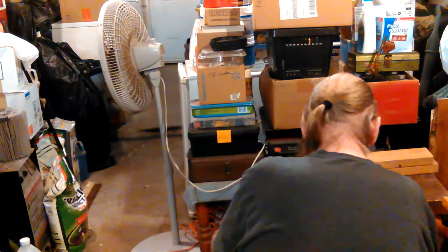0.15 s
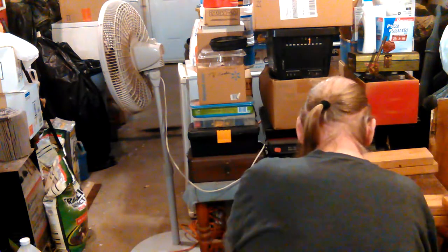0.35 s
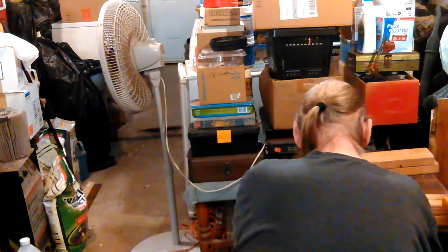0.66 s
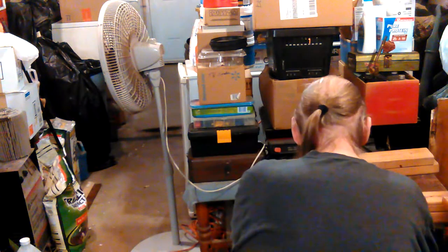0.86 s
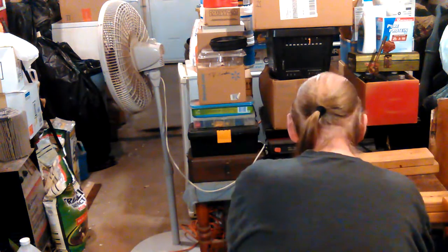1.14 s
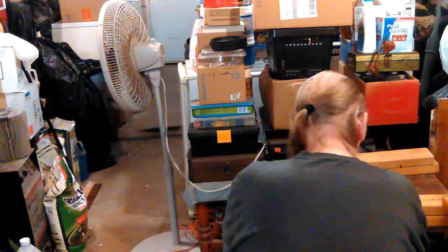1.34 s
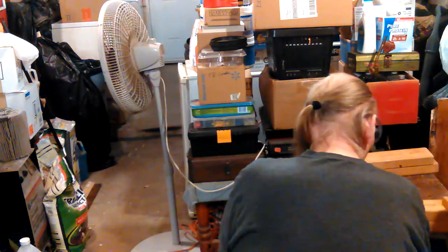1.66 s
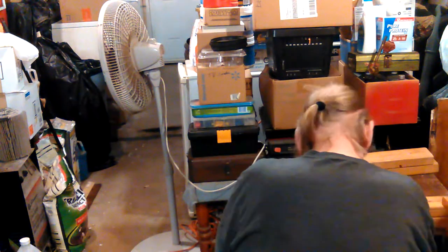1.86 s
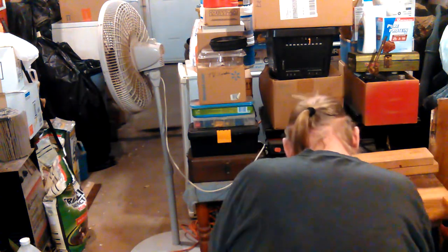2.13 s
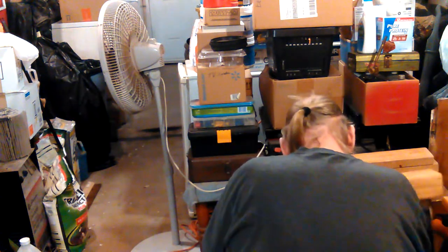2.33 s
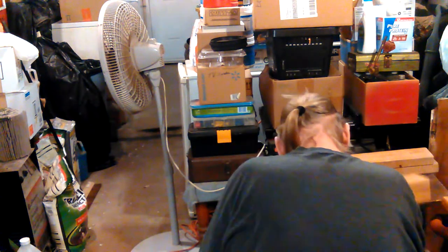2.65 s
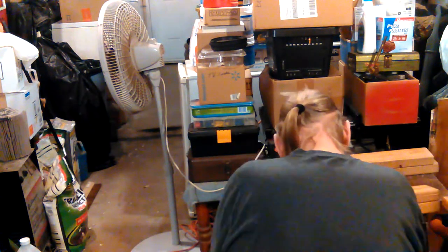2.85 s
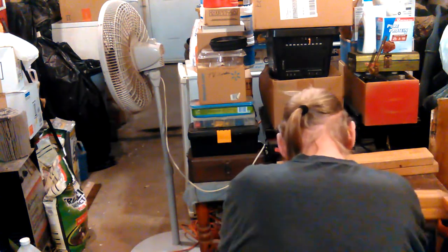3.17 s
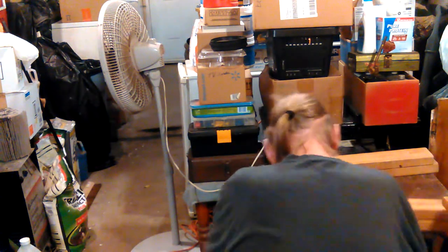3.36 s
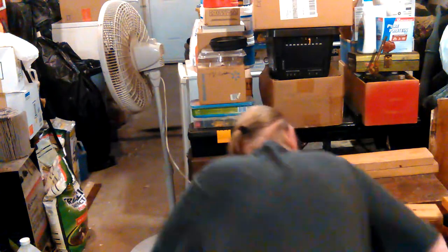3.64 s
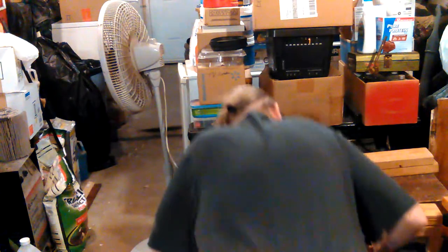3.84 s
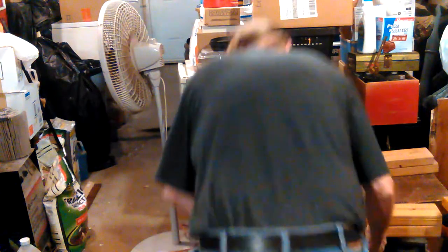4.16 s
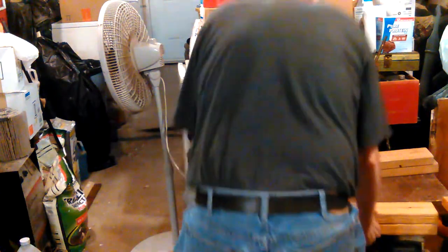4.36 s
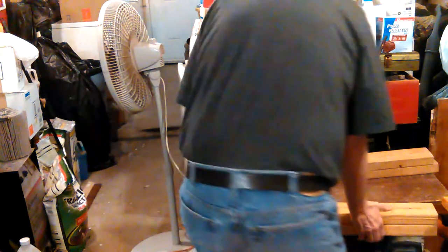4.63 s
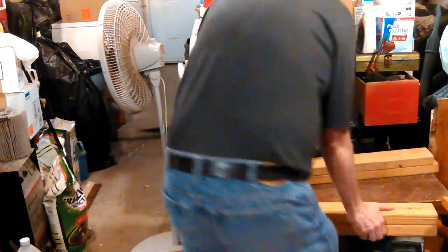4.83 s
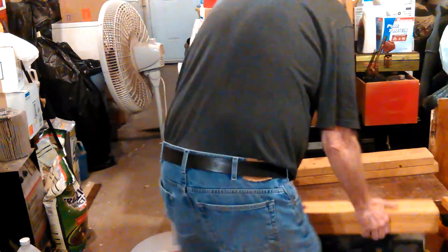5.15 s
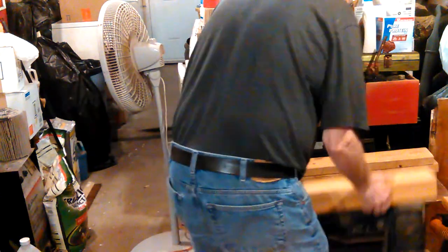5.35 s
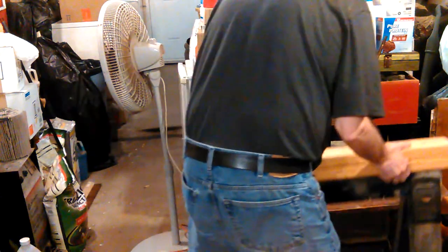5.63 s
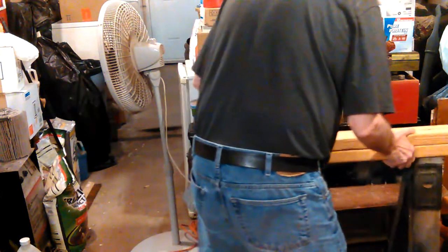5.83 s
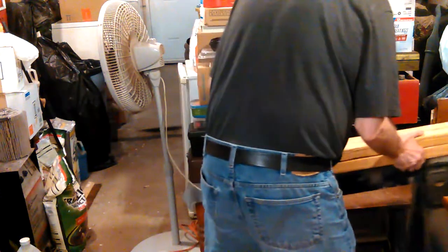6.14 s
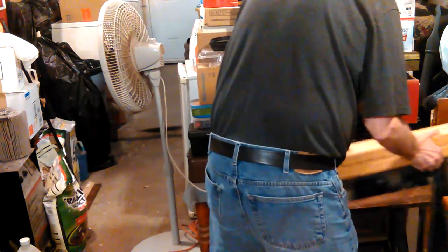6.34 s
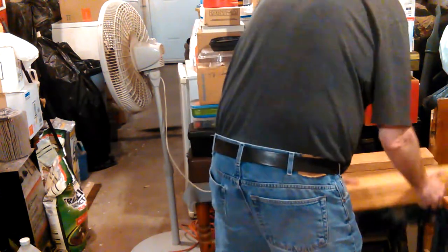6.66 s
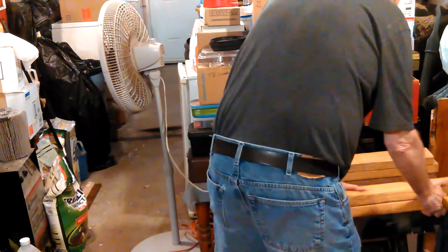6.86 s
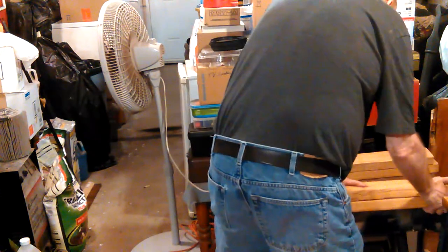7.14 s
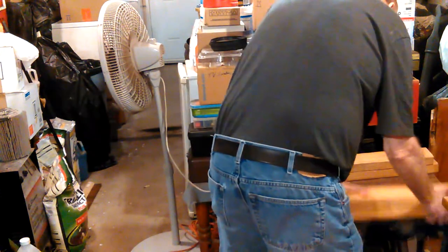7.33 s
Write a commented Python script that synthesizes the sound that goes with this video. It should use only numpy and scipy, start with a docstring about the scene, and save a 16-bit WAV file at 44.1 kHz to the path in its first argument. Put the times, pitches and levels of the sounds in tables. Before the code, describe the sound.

Over a very faint low rumble and hiss, dry wood rubs softly from the start. Board knocks come at 0.3, 0.4 and 0.5 s, with a firm one at 0.8, lighter taps near 1.3, and knocks at 1.6 and 1.7 with a small metal clink. Soft rubbing continues from 2 s; at 2.9 a strong, dull wooden clunk lands. Another sharp knock at 3.5 brings bright metal clinks, which cluster again from 3.9 to 4.4 as a stool scrapes back roughly, fading into one soft thud at 4.4. It quiens to faint scuffs and a small tap at 5.0. A bundle clunks dully at 5.5, more weakly at 5.7. A brief squeak at 6.1 is followed by muted bumps at 6.35 to 6.8. After faint rubbing, the load slams down at 7.4, loudest of all, hard and woody with a low boom. Close pickup, short garage reverberation.

```python
"""Short wooden boards are shifted, knocked together and stacked on a bench in a cluttered garage.
Over a faint hush, wood rubs on wood by stick-slip friction and a stool's metal joints clink by modal ringing.
Knocks are damped modes in a dense ring scattered off the clutter; heavy blows boom the bench's lowest modes.
A bundle clunks as one dull body, in two stages; midway the stool scrapes back with more clinks and thuds once as
the worker stands. A bundle briefly squeaks on the stack, and at the end the load lands hard on it."""
import sys
import numpy as np
from scipy import signal
from scipy.io import wavfile

SR = 44100
rng = np.random.default_rng(int(sys.argv[2]) if len(sys.argv) > 2 else 0)


def wrap_up_sound(samples):
    """Save the sound to the file named by the first command line argument, as 16-bit audio."""
    columns = np.atleast_2d(samples).T
    # keep every value between -1 and 1, then stretch to whole-number steps
    tamed = np.clip(columns, -1, 1)
    steps = np.round(tamed * 32767).astype(np.int16)
    wavfile.write(sys.argv[1], SR, steps)


N = 330309

# Normal modes of the loose boards. Each row: frequency in Hz, strength in dB, t60 in seconds.
BOARD_MODES = [(207.2, 1.5, 0.13), (337, -8, 0.2), (405.3, 2, 0.12), (453.4, -8, 0.16), (516, -3.5, 0.13),
               (604, -6, 0.13), (785, -1.5, 0.1), (895, -1, 0.13), (998, -5, 0.083), (1117, -2.5, 0.097),
               (1173.5, -5.5, 0.14), (1320, -9, 0.22), (1392, -6.5, 0.1), (1593, 1.5, 0.082),
               (1795, -19, 0.45), (2184, 0, 0.12), (2344, -8, 0.18), (2516, -6.5, 0.152),
               (3310, -12.5, 0.28), (3890, -6, 0.11), (5480, -1, 0.2)]
# Normal modes of the stool's frame. Each row: frequency in Hz, strength in dB, t60 in seconds.
STOOL_MODES = [(3080, -3, 0.2), (4180, -14.5, 0.25), (4180, -10, 0.24), (5750, -7.5, 0.14),
               (5840, -1.5, 0.089), (6400, -5.5, 0.19), (6470, -6, .2), (6060, -9.5, 0.16),
               (6550, 1.5, 0.074), (7200, -4.5, 0.21), (7430, -10, 0.25), (8800, -2, .15),
               (9690, -7.5, .15)]
# Frequencies in Hz at which weight, level, brightness and snap act.
TILT_HZ = [300, 1100, 4000, 10000]
EDGES = 22 * 2 ** np.arange(0, 9.6, .5)  # half-octave band edges, Hz
CENTRES = np.sqrt(EDGES[1:] * EDGES[:-1])
AGE = np.arange(int(.6 * SR)) / SR  # seconds since a blow


def from_db(db):
    """Logarithmic level: decibels become an amplitude ratio."""
    return 10 ** (np.asarray(db) / 20)


def rms_one(x):
    """Normalization: the mean power is scaled to 1."""
    return x / np.sqrt(np.mean(x ** 2) + 1e-20)


def at_hz(points, hz):
    """Interpolation of a spectrum along logarithmic frequency."""
    f, value = np.transpose(points)
    return np.interp(np.log(hz), np.log(f), value)


def add(track, sound, s):
    """Superposition: a sound is summed in at a time in seconds."""
    start = max(round(s * SR), 0)
    track[:, start:start + sound.shape[-1]] += sound[..., :N - start]


def spread(mid, side, hz):
    """Mid-side stereo: left and right differ chiefly in the treble."""
    # Stereo width. Each row: frequency in Hz, side against mid in dB.
    stereo_width = [(2500, -50), (4500, -60.5), (7000, -4.5), (13000, -6.5)]
    width = from_db(at_hz(stereo_width, hz))
    return mid + width * side * np.array([[1], [-1]])


def split(sources):
    """Band analysis: half-octave stereo bands of rms 1, neighbours taking unrelated sources."""
    bands = []
    for k, hz in enumerate(CENTRES):
        sos = signal.butter(2, EDGES[k:k + 2], "band", fs=SR, output="sos")
        mid, side = signal.sosfilt(sos, sources[k % 2] + 1e-18)
        bands.append(rms_one(spread(mid, side, hz)))
    return bands


def hush():
    """Steady broadband noise: the low rumble and faint hiss of the still garage."""
    # Relative spectral density of the still air. Each row: frequency in Hz, density in dB per Hz.
    hush_spectrum = [(15, -30), (25, 3.5), (91, 0), (151, -7.5), (231, -14.5), (511, -16.5), (569, -22),
                     (632, -12.5), (703, -19.5), (1600, -22), (1970, -24), (5260, -28), (14000, -37)]
    bands = split(rng.standard_normal((2, 2, N)))
    air = 0
    for hz, band in zip(CENTRES, bands):
        # band power grows with bandwidth, hence with frequency
        air = air + band * from_db(at_hz(hush_spectrum, hz)) * np.sqrt(hz)
    return from_db(-64) * rms_one(air)


def clutter(x, echo_db, count=12):
    """Comb filtering: near boxes and shelves return echoes in a fixed pattern of delays."""
    lags_s = .0011 * 1.29 ** np.arange(count)
    echoes = 0
    for k, lag_s in enumerate(lags_s):
        echoes = echoes + (-1) ** (k // 2) * np.roll(x, round(lag_s * SR), axis=-1)
    return x + from_db(echo_db) * echoes


def resonate(x, modes, boost_db):
    """Resonance: a broadband drive is reinforced at the modes of the excited body."""
    out = x
    for hz, mode_db, t60 in modes:
        # this Q makes the filter ring for about a third of t60
        b, a = signal.iirpeak(hz, hz * t60 / 6, fs=SR)
        out = out + from_db(boost_db + mode_db) * signal.lfilter(b, a, x)
    return out


def drift():
    """Random modulation: quick uneven wavering between random values of unit spread."""
    step_s = .022
    knots = rng.standard_normal(int(N / SR / step_s) + 2)
    return np.interp(np.arange(N) / SR / step_s, np.arange(len(knots)), knots)


def stroke(length_s, growth_db):
    """Force envelope: a push takes hold (the longer, the more gently), grows or fades, then dies away in the room."""
    attack_share, release_db_per_s = .22, 255
    t = np.arange(int(length_s * SR) + len(AGE)) / SR
    attack = 1 - np.exp(-(t / (attack_share * length_s)) ** 2)
    held_db = growth_db * (np.minimum(t / length_s, 1) - .5)
    release_db = release_db_per_s * np.maximum(t - length_s, 0)
    return attack * from_db(held_db - release_db)


def sliding(strokes, modes, slips_per_s, size_db, judder_db, smear_db, boost_db):
    """Stick-slip friction: tiny uneven slips, smeared by the room, excite wood and frame."""
    # Colour of sliding. Each row: frequency in Hz, level in dB per half octave.
    slide_colour = [(50, -23.5), (120, -18.5), (210, -11), (340, -8), (560, -11.5), (900, -8), (1500, -8),
                    (2300, -7.5), (4000, -9), (6200, -7), (9000, -18), (13500, -21)]
    shape = (2, 2, N)
    happens = rng.random(shape) < slips_per_s / SR
    slips = happens * from_db(size_db * np.minimum(rng.exponential(1, shape), 4))
    smear = from_db(smear_db) * rng.standard_normal(shape)
    friction = rms_one(slips * rng.choice([-1, 1], shape)) + smear
    bands = split(resonate(clutter(friction, echo_db=-24), modes, boost_db))
    pushes = [stroke(length_s, growth_db) for _, length_s, _, _, _, growth_db in strokes]
    out = 0
    for hz, band in zip(CENTRES, bands):
        force = np.zeros((1, N))
        for (s, _, level, weight, bright, _), push in zip(strokes, pushes):
            tilt = at_hz(list(zip(TILT_HZ, (weight, 0, bright))), hz)
            add(force, push * from_db(level + tilt), s)
        out = out + band * force * from_db(at_hz(slide_colour, hz))
    return out * from_db(judder_db * drift())


def rubbing():
    """Dense stick-slip friction: wood and sleeves rub over wood."""
    # Each row: start in seconds, length in seconds, level in dB, weight (bass against level) in dB,
    # brightness (treble against level) in dB, growth over the stroke in dB.
    rubs = [(0.0, 0.11, -63, -0.5, -11, 1), (0.14, 0.3, -58.5, -5, 2, 6), (0.47, 0.078, -48, -1, -2, -9.5),
            (0.56, 0.087, -70, -3, -11, -6), (1.413, 0.019, -58.5, 3, -20, -4),
            (1.445, 0.097, -56.5, 0.5, 5, -5.5), (1.78, .15, -56.5, -0.5, -3, -10),
            (2.04, 0.24, -69.5, 7, -6, -1.5), (2.28, 0.22, -60.5, 0, -15, -4),
            (2.46, 0.18, -55, -1.5, -15, 1.5), (2.65, 0.1, -64.5, -8, -4.5, 0),
            (2.775, 0.031, -66.5, 2, 8, 6), (3.15, 0.19, -65.5, -8, 10.5, 7.5),
            (3.375, .03, -56.5, 3, -1.5, -6.5), (3.43, 0.052, -62.5, -13, 2, 13),
            (3.66, 0.29, -58.5, 4.5, -4, -7), (4.5, 0.071, -72, 6, 1, -4),
            (4.85, 0.044, -64.5, -10, 5, 6.5), (5.1, .1, -67.5, -7, -3, -14),
            (5.27, 0.16, -74.5, -4, 3.5, 2), (5.84, .07, -83, 12, 7, -3), (6.083, 0.026, -57, 1, 3.5, 5.5),
            (6.46, 0.19, -64.5, 15, -1.5, -8), (6.82, 0.12, -62.5, 13.5, -1.5, -7),
            (6.97, .2, -69, 7, 2, 10), (7.18, .1, -64.5, 14.5, -3, -1.5), (7.29, 0.1, -74.5, 10, -7, 12)]
    return sliding(rubs, BOARD_MODES + STOOL_MODES, slips_per_s=500, size_db=2.0,
                   judder_db=2.0, smear_db=0.5, boost_db=6.5)


def scatter(rise_s, hold_s, early_t60, late_db, direct_db, direct_s):
    """Room response by band: the contact, a crowd of near reflections, then the reverberant tail."""
    # Late reverberation of the garage. Each row: frequency in Hz, t60 in seconds.
    garage_t60 = [(60, 1.5), (300, 0.4453), (1200, 0.354), (5000, 0.48), (13000, 0.3)]
    since = np.maximum(AGE - hold_s, 0)
    direct = from_db(direct_db) * np.exp(-AGE / direct_s)
    early = from_db(-60 * since / early_t60)
    onset = 1 - np.exp(-AGE / rise_s)
    envelopes = []
    for hz in CENTRES:
        late = from_db(late_db - 60 * since / at_hz(garage_t60, hz))
        # unrelated arrivals add by power
        envelopes.append(onset * np.sqrt(direct ** 2 + early ** 2 + late ** 2))
    return envelopes


def blow_db(hz, blow):
    """Excitation spectrum: weight sets the bass, hardness of contact the treble, and the note stands out."""
    note_lift_db, note_octaves = 3, 0.32
    level, weight, bright, snap, note_hz = blow
    tilt = at_hz(list(zip(TILT_HZ, (weight, 0, bright, bright + snap))), hz)
    distance = np.log2(hz / note_hz) / note_octaves
    return level + tilt + note_lift_db * np.exp(-.5 * distance ** 2)


def dense_ring(strengths_db, colour, bands, envelopes):
    """Statistical acoustics: countless damped modes and reflections become noise of set energy per band."""
    out = 0
    start = rng.integers(bands[0].shape[-1] - len(AGE))
    for hz, level_db, band, envelope in zip(CENTRES, strengths_db, bands, envelopes):
        burst = band[:, start:start + len(AGE)] * envelope
        envelope_rms = np.sqrt(np.mean(envelope ** 2))
        out = out + from_db(level_db + at_hz(colour, hz)) * rms_one(burst) * envelope_rms
    return out


def clear_ring(strengths_db, modes, swell_s):
    """Modal superposition: strong damped modes in alternating sign, varied a little by where the blow lands."""
    out = 0
    for k, (hz, mode_db, t60) in enumerate(modes):
        level_db = strengths_db[k] + mode_db + rng.standard_normal()
        turn = 2 * np.pi * hz * AGE
        decay = from_db(level_db - 60 * AGE / t60)
        out = out + (-1) ** k * spread(np.sin(turn), np.cos(turn), hz) * decay
    return out * (1 - np.exp(-AGE / swell_s))


def blows(events, modes, colour, envelopes, boost_db, swell_s, ring_db, note_db):
    """Impact excitation: each blow sounds clear modes and a note in a dense ring tinted by the same modes."""
    note_t60 = 0.13  # seconds
    out = np.zeros((2, N))
    field = clutter(rng.standard_normal((2, 2, N // 3)), echo_db=-18)
    bands = split(resonate(field, modes, boost_db))
    for s, *blow in events:
        rung = np.array([*modes, (blow[-1], note_db, note_t60)])
        dense = dense_ring(blow_db(CENTRES, blow), colour, bands, envelopes)
        clear = clear_ring(blow_db(rung[:, 0], blow), rung, swell_s)
        add(out, dense + from_db(ring_db) * clear, s)
    return out


def stool():
    """Impact of stiff bodies: loose metal joints clink as the weight on them shifts."""
    # Each row: start in seconds, level in dB, weight (bass against level) in dB,
    # brightness (treble against level) in dB.
    clinks = [(0.028, -67, 4, 8.5), (0.152, -62, -14, 4), (1.544, -45, -2, -5.5), (3.479, -41.5, 6, 7.5),
              (3.565, -31, -12, -0.5), (3.933, -39.5, -3.5, 5.5), (3.965, -34, -4, 10.5),
              (3.987, -35, -12.5, 7), (4.127, -38, 2, -0.5), (4.297, -44.5, -6, -2.5),
              (4.377, -48.5, -18, 5)]
    # Colour of a metal blow. Each row: frequency in Hz, level in dB per half octave.
    metal_colour = [(50, -26), (120, -24), (300, -13.5), (1100, -16), (2200, -12.5), (4000, -10),
                    (6200, -7.5), (9000, -7), (13500, -13.5)]
    snap_db, note_hz = -12, 6330
    envelopes = scatter(rise_s=0.00054, hold_s=0.021, early_t60=0.21,
                        late_db=-17.0, direct_db=-1, direct_s=0.0021)
    contacts = [(*row, snap_db, note_hz) for row in clinks]
    return blows(contacts, STOOL_MODES, metal_colour, envelopes,
                 boost_db=4, swell_s=0.0021, ring_db=-10, note_db=-12)


def bench():
    """Low-order resonance: heavy blows set the loaded bench booming on its lowest modes."""
    # Each row: start in seconds, level in dB.
    booms = [(0.299, -57.5), (1.59, -55.5), (1.74, -48.5), (2.925, -53.5), (3.509, -50), (6.352, -49.5),
             (6.741, -48.5), (7.416, -38.5)]
    # Normal modes of the bench. Each row: frequency in Hz, strength in dB, t60 in seconds.
    bench_modes = [(59.97, -0.5, 0.99), (97.3, -8.5, .35), (147, 5, 0.28), (190, -10, 0.18)]
    boom = 0
    for k, (hz, mode_db, t60) in enumerate(bench_modes):
        decay = from_db(mode_db - 60 * AGE / t60)
        boom = boom + (-1) ** k * np.sin(2 * np.pi * hz * AGE) * decay
    swell = 1 - np.exp(-AGE / 0.0074)
    out = np.zeros((2, N))
    for s, level_db in booms:
        add(out, from_db(level_db) * boom * swell, s)
    return out


def knocking():
    """Modal impact: boards knock, the stool thuds once and a bundle briefly squeaks on the stack."""
    # The thud is at 4.411 s and the squeak at 6.094 s; both share the modes and colour of the knocks.
    # Each row: start in seconds, level in dB, weight (bass against level) in dB, brightness (treble
    # against level) in dB, snap (very top against treble) in dB, each event's own note in Hz.
    knocks_thud_squeak = [(0.300, -28.5, -12.5, -17.5, -4, 531), (0.403, -26.5, -12.5, -12, -6, 1010),
                          (0.501, -36, -11, -10.5, -4.5, 405), (0.73, -58.5, -4.5, -1, -20, 333),
                          (0.808, -24.5, -15, -16, -6.5, 417), (1.28, -51.5, -9.5, -8, -16, 330),
                          (1.368, -46.5, -24, -9.5, -6, 877), (1.587, -24.5, -11, -21.5, -11, 297),
                          (1.706, -45.5, 0, -7, -20, 210), (1.728, -30, -1, -12.5, -10.5, 955),
                          (2.291, -48, -20, -15, -10, 393), (2.83, -41, -25, -13.5, -22, 1405),
                          (2.905, -26.5, -6.5, -17.5, -18, 239), (2.921, -15.5, -16, -32.5, -14, 450),
                          (3.329, -42.5, -21, -19, -9, 1363), (3.383, -48.5, -5.5, -5, -20, 310),
                          (3.504, -15.5, -14.5, -13.5, -7, 231), (4.104, -34.5, -13, -13.5, -22, 1580),
                          (4.411, -43.5, 2, -11, -15, 385), (4.702, -60.5, 12, 9.5, 2, 212),
                          (4.761, -61, 1, -3.5, -17, 200), (5.028, -43, 0, -0.5, -15, 185),
                          (6.094, -39, -8.5, -3, -32, 2800), (6.344, -37, -1, -23.5, -12, 240),
                          (6.411, -40, 0, -12, -26, 420), (6.58, -46.5, -3.5, -16.5, -4, 620),
                          (6.699, -37.5, -4, -10, -11, 384), (6.774, -44, -1, -4, -16, 2930),
                          (6.979, -43.5, -16, -12.5, -16, 1160), (7.41, -9.5, -16, -13.5, -14, 482),
                          (7.4155, -8, -18, -18, -7.5, 1560)]
    # Colour of these sounds. Each row: frequency in Hz, level in dB per half octave.
    wood_colour = [(50, -22.5), (120, -19), (200, -16), (330, -6.5), (650, -15), (1150, -15.5), (2200, -12),
                   (4000, -9.5), (6200, -3), (9000, -12), (13500, -13)]
    envelopes = scatter(rise_s=0.0023, hold_s=0.012, early_t60=0.19,
                        late_db=-12.5, direct_db=-3.0, direct_s=0.006)
    return blows(knocks_thud_squeak, BOARD_MODES, wood_colour, envelopes,
                 boost_db=4, swell_s=0.0088, ring_db=-10, note_db=3.5)


def bundle():
    """Soft impact of a large mass: the dull bundle lands in two stages and its low modes build slowly."""
    # Each row: start in seconds, level in dB, weight (bass against level) in dB,
    # brightness (treble against level) in dB.
    clunks = [(2.922, -34.5, -1.5, -21), (5.475, -20, -6.5, -19), (5.713, -41.5, -0.5, -13),
              (6.738, -44, 8.5, -4), (6.865, -64, 17, -1)]
    # Normal modes of the bundle. Each row: frequency in Hz, strength in dB, t60 in seconds.
    bundle_modes = [(207, 0.5, 0.12), (251, -5.5, 0.04), (317, -0.5, 0.095), (340.2, 1, 0.2),
                    (465, -5, 0.15), (783, -3, 0.14), (867, -5.5, 0.066), (938, -6.5, 0.144),
                    (1030, -1.5, 0.13), (1210, -13, 0.18), (1400, -17, .15), (1580, -5, 0.096),
                    (1790, -21, 0.2)]
    # Colour of a clunk. Each row: frequency in Hz, level in dB per half octave.
    bundle_colour = [(50, -38), (120, -22), (210, -14.5), (340, -4), (560, -10.5), (850, -12.5),
                     (1500, -16), (2200, -11), (4000, -8.5), (6200, -4), (9000, -11.5), (13500, -14)]
    snap_db, note_hz = -11.5, 281
    envelopes = scatter(rise_s=0.0055, hold_s=0.0041, early_t60=0.15,
                        late_db=-16.5, direct_db=4, direct_s=0.0031)
    # one edge lands first; the rest follows 15 ms later, heavier and duller (same columns)
    settles = np.array(clunks) + (0.015, -1.5, 1, -10.5)
    contacts = [(*row, snap_db, note_hz) for row in [*clunks, *settles]]
    return blows(contacts, bundle_modes, bundle_colour, envelopes,
                 boost_db=4, swell_s=0.0071, ring_db=-3.5, note_db=-6.5)


def dragging():
    """Sparse stick-slip friction: the stool is pushed back and slows."""
    # Each row: start in seconds, length in seconds, level in dB, weight (bass against level) in dB,
    # brightness (treble against level) in dB, growth over the stroke in dB.
    drags = [(4, 0.064, -43.5, 2.5, -4, -2), (4.11, 0.32, -47.5, 5.1, -4.5, -13)]
    return sliding(drags, BOARD_MODES + STOOL_MODES, slips_per_s=160, size_db=1.5,
                   judder_db=1.7, smear_db=-2, boost_db=12)


def scene():
    """Superposition of all sources in the garage."""
    return hush() + rubbing() + stool() + bench() + knocking() + bundle() + dragging()


def record(dry):
    """Band limiting: the sound is mono below the treble, and its top is cut steeply."""
    mid = (dry[0] + dry[1]) / 2
    side = (dry[0] - dry[1]) / 2
    treble_only = signal.butter(10, 3700, "high", fs=SR, output="sos")
    side = signal.sosfilt(treble_only, side)
    top_cut = signal.ellip(10, .3, 70, 14250, fs=SR, output="sos")
    return signal.sosfilt(top_cut, [mid + side, mid - side])


dry = scene()
out = record(dry)
wrap_up_sound(out)
```